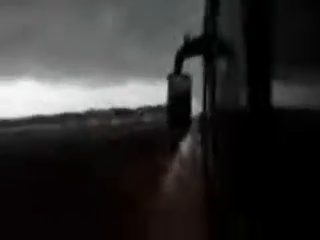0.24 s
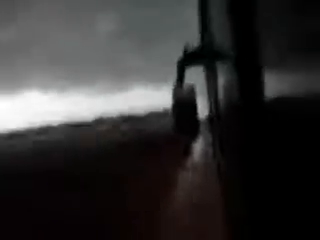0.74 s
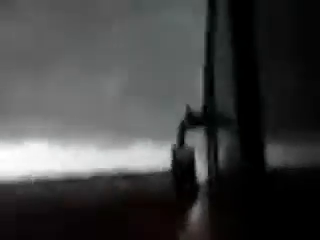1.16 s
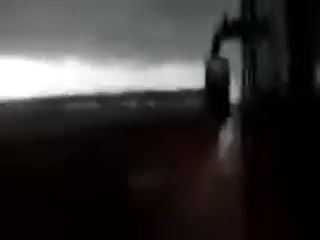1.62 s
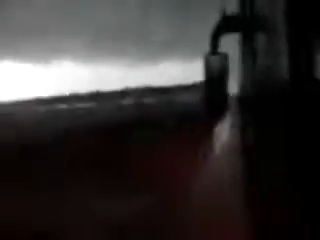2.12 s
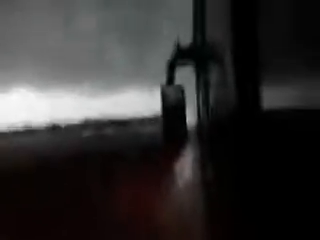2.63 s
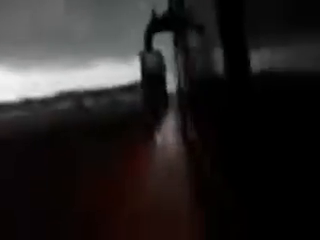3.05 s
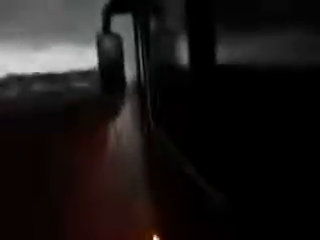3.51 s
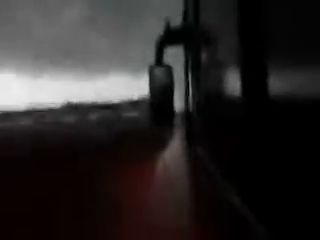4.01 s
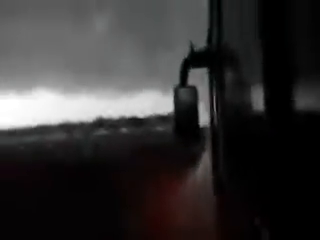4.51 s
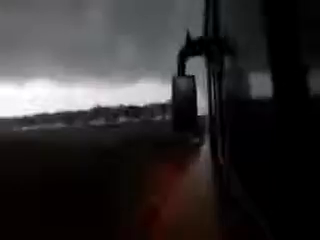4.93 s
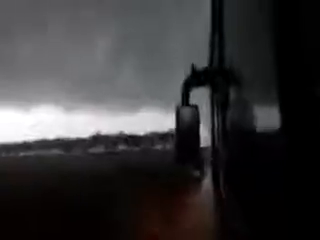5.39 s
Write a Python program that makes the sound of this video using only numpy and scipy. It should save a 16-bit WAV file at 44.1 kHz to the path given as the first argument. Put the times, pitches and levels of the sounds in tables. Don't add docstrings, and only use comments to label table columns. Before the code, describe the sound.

Inside a truck cab in a storm, wind throbs and slaps the phone microphone over drumming rain, hissing road spray and a low diesel drone.

```python
import sys
import numpy as np
from scipy import signal
from scipy.fft import rfft, irfft, next_fast_len
from scipy.io import wavfile
from scipy.ndimage import uniform_filter1d, map_coordinates

SR = 44100
rng = np.random.default_rng(int(sys.argv[2]) if len(sys.argv) > 2 else 0)


def pcm_store(signal):
    levels = np.round(np.clip(np.atleast_2d(signal), -1, 1) * 32767)
    wavfile.write(sys.argv[1], SR, levels.astype(np.int16).T)


def volts_from_db(level):
    exponent = np.asarray(level, float) / 20
    return 10 ** exponent


N = 249606


def unit(x):
    return x / np.sqrt(np.mean(np.abs(x) ** 2) + 1e-20)


def along(points, hz):
    point_hz, value = np.transpose(points)
    return np.interp(np.log(hz + 1), np.log(point_hz + 1), value)


def curves(rows, t):
    start_s, *columns = np.transpose(rows)
    return [np.interp(t, start_s, column) for column in columns]


def wobble(rate, t):
    return map_coordinates(rng.standard_normal(2000), [t * rate])


def bump(t, middle_s, length_s):
    return np.exp(-np.abs(2 * (t - middle_s) / length_s) ** 2.4)


def bursts(rows, edge):
    out, t = np.zeros(N + 8192), np.arange(-4096, 4096) / SR
    for middle_s, length_s, level_db in rows:
        shape = np.exp(-np.abs(2 * t / length_s) ** edge)
        out[round(middle_s * SR) - 4096:][:8192] += volts_from_db(level_db) * shape
    return out[:N]


def patter(rate, spread_db):
    hit = rng.random(N) < rate / SR
    size_db = spread_db * np.minimum(rng.exponential(size=N), 5)
    return unit(hit * rng.standard_normal(N) * volts_from_db(size_db))


def band(low_hz, high_hz, count):
    hz = np.fft.rfftfreq(count, 1 / SR)
    return unit(irfft(rfft(rng.standard_normal(count)) * (hz > low_hz) * (hz < high_hz), count))


def rumble(spectrum, even_s):
    count, width = next_fast_len(N), round(even_s * SR)
    gain = volts_from_db(along(spectrum, np.fft.rfftfreq(count, 1 / SR)))
    x = irfft(rfft(rng.standard_normal(count)) * gain, count)[:N]
    power = uniform_filter1d(uniform_filter1d(x ** 2, width), width)
    return x / np.sqrt(np.abs(power) + 1e-20)


def shaped(x, colour_db, patchy_db):
    hz, t, z = signal.stft(x, SR, nperseg=1024)
    patches = uniform_filter1d(rng.standard_normal(z.shape), size=12, axis=0)
    patches = unit(uniform_filter1d(patches, size=5, axis=1))
    gain = volts_from_db(colour_db(hz[:, None], t) + 0 * t)
    gain = gain / np.sqrt(np.mean(gain ** 2, axis=0))
    return unit(signal.istft(z * gain * volts_from_db(patchy_db * patches), SR, nperseg=1024)[1][:N])


# start_s, level_db
AIRSTREAM = [(0.23, -25.5), (0.62, -27.5), (0.64, -22), (1.42, -19.5), (1.79, -20), (1.85, -13),
             (2.94, -27.5), (2.97, -22.5), (3.06, -25), (3.38, -20.5), (3.42, -16.5), (3.48, -26),
             (3.53, -20), (3.87, -21.5), (4.84, -19), (5.66, -22)]


def airstream_db(t):
    return curves(AIRSTREAM, t)[0]


# middle_s, length_s, level_db, extra_bite_db
GUSTS = [(0.28, 0.092, -23.5, -5.5), (0.563, 0.069, -26.5, 6), (1.018, 0.059, -32, -24),
         (1.171, 0.12, -18.5, -11), (1.378, 0.11, -22.5, -0.5), (1.65, 0.079, -20, -11),
         (1.745, .05, -29, 3.5), (1.926, 0.059, -9.5, 0), (2.033, .12, -19.5, -0.5), (2.245, 0.17, -25, 3),
         (2.522, 0.24, -38, 8), (2.745, 0.031, -17, -8), (2.884, .1, -25, 1), (3.086, 0.18, -22.5, 0.5),
         (3.32, 0.14, -21.5, 2), (3.432, 0.11, -11, 2), (3.568, 0.23, -17.5, -0.5),
         (3.598, 0.037, -17.5, 6.5), (3.677, 0.081, -6, -11.5), (4.586, 0.15, -21, -3.5),
         (4.835, 0.12, -22.5, -6), (4.98, 0.064, -21, -10), (4.093, 0.31, -26.5, -2.5),
         (5.229, .1, -30, -14), (5.619, 0.13, -17, -10)]


def gusty(t, calm_db, bite_share):
    strength_db = airstream_db(t)
    lull_db = 0.37 * (strength_db - strength_db.mean())
    power = volts_from_db(2 * (calm_db + lull_db))
    for middle_s, length_s, level_db, bite_db in GUSTS:
        power = power + volts_from_db(2 * (level_db + bite_share * bite_db)) * bump(t, middle_s, length_s)
    return np.sqrt(power)


# pitch_hz, level_db
HEAVE = [(4, -20.5), (14, 5.5), (26, 2), (42, 4), (55, -13), (75, -8), (150, -74)]


def heave(t):
    return volts_from_db(airstream_db(t) + 1.8 + 2 * wobble(14, t)) * rumble(HEAVE, even_s=0.34)


# pitch_hz, level_db
THROB = [(30, -41), (52, 0), (80, -3.5), (120, -6.5), (150, -11), (260, -76)]


def throb(t):
    return gusty(t, calm_db=-25.5, bite_share=0) * rumble(THROB, even_s=0.12)


# pitch_hz, level_db
BUFFET = [(60, -43), (130, -12.5), (160, 2), (220, -2.5), (350, -5.5), (550, -11), (900, -36.5),
          (2000, -75)]


def buffet(t):
    rough = rumble(BUFFET, even_s=0.058)
    rough = unit(volts_from_db(2.1 * wobble(35, t)) * (rough + 0.12 * (rough ** 2 - 1)))
    return volts_from_db(-2.0) * gusty(t, calm_db=-30 - 0.1 * wobble(12, t), bite_share=1) * rough


# start_s (moment of the peak), peak_db, pitch_hz
POPS = [(.485, -8, 171), (0.554, -10, 182), (0.5678, -3.5, 145), (1.39, -10.5, 231), (1.8816, -2.5, 310),
        (1.9158, -17, 259.2), (1.943, -3.5, 150), (1.9506, -3.5, 109.5), (1.9717, -0.5, 153),
        (1.999, -1.5, 90.7), (2.075, -8.5, 79.6), (3.3121, -5, 265.7), (3.3248, -4, 168),
        (3.398, -12, 68.7), (3.4313, 3, 188), (3.449, -2, 189), (3.46, -3, 72.5), (3.469, 1, 153),
        (3.4795, -3, 75), (3.4951, 3.5, 272), (3.5247, -3, 254), (3.553, -3.5, 258), (3.587, 0, 112.6),
        (3.5924, -8.5, 214), (3.6512, -1.5, 62.3), (3.67, -5, 70.4), (3.6858, -1, 60), (3.699, -4.5, 58.5)]
# start_s (moment of the peak), peak_db, pitch_hz
FRONT = [
    (1.9092, 1.5, 110),
    (1.9104, -5, 480),
    (1.9252, .5, 165),
    (1.9248, -6, 520),
]
# start_s (moment of the peak), peak_db, pitch_hz
OVERLOAD = (3.4173, 1.6, 62)


def slapped(turbulence, t):
    loose, slaps, overload = turbulence.copy(), np.zeros(N), np.zeros(N)
    for start_s, peak_db, pitch_hz in POPS + FRONT + [OVERLOAD]:
        near = slice(round(start_s * SR) - 900, round(start_s * SR) + 1800)
        u = np.pi * pitch_hz * (t[near] - start_s)
        loose[near] *= 1 - 0.27 * np.exp(-(u / np.pi / 1.34) ** 2)
        push = (1 - 2 * u * u) * np.exp(-u * u) + 0.81 * np.exp(-(2.6 * u) ** 2)
        target = overload if start_s == OVERLOAD[0] else slaps
        target[near] += volts_from_db(peak_db - 7.5) * push
    out, stiff_at = loose + slaps, 0.86
    return out / (1 + (out / stiff_at) ** 6) ** (1 / 6) + overload


def wind(t):
    turbulence, limit = heave(t) + throb(t) + buffet(t), 0.6
    return slapped(limit * np.tanh(turbulence / limit), t)


# start_s, level_db
RAIN = [(.22, -30), (.5, -26.5), (1.25, -26), (1.5, -28.5), (2.25, -28.5), (3, -29.5), (3.5, -27),
        (3.75, -28), (4.25, -24.5), (4.7, -24), (5.1, -25.5), (5.66, -23)]
# start_s, drumming_top_hz, facing_opening_db
GAP = [(.2, 2680, 8.5), (.6, 3150, 5.5), (1, 2840, 6), (1.3, 2830, 5.5), (1.6, 2580, 4.5), (2, 2780, 1),
       (2.3, 2770, -1.5), (2.6, 2420, -4.5), (3, 2020, -3.5), (3.3, 2060, -11), (3.75, 2270, -4),
       (4, 2800, -2.5), (4.5, 2800, -1), (4.8, 2630, -3), (5.3, 2820, 6.5), (5.66, 3280, 7.5)]
# pitch_hz, level_db
SHELL = [(150, -25.5), (350, -10.5), (600, -1.5), (900, 0.5), (1650, -1), (2000, -3.5), (2400, -9.5),
         (4000, -7.5)]


def rain(t):
    def colour_db(hz, s):
        edge_hz, upper_db = curves(GAP, s)
        harder_db = curves(RAIN, s)[0] + 28.5
        lower = (0.1 - 0.61 * harder_db) * np.clip(np.log2(1250 / (hz + 1)) / 0.94, 0, 1)
        sings = 0.6 * np.maximum(harder_db, 0) * np.exp(-((hz - 1500) / 350) ** 2)
        upper = (upper_db + 1.0) * np.clip(np.log2((hz + 1) / 1500) / 0.85, 0, 1)
        ridge = 2.6 * np.exp(-((hz / edge_hz - 0.94) / 0.19) ** 2)
        cut = 10 * np.log10(1 + (hz / edge_hz) ** 40)
        return along(SHELL, hz) + sings + upper + lower + ridge - cut
    drums = patter(5000, spread_db=2.0) + 0.81 * rng.standard_normal(N)
    level_db = curves(RAIN, t)[0] + 4.0 + 0.35 * wobble(16, t)
    return volts_from_db(level_db) * shaped(drums, colour_db, patchy_db=0.93)


# middle_s, length_s, level_db
SPLASHES = [
    (1.22, 0.022, -33),
    (2.166, 0.0074, -22),
    (2.5, 0.0082, -59),
    (3.02, 0.017, -39),
    (3.12, 0.016, -30),
    (3.5, 0.026, -36.5),
    (3.28, 0.0065, -29),
    (5.6, 0.024, -31.5),
]


def thrown_water():
    return bursts(SPLASHES, edge=3.0)


# start_s, level_db
SPRAY = [(.22, -32), (.4, -29.5), (.62, -26.5), (.85, -30), (1.38, -29), (1.48, -33), (1.72, -32),
         (1.82, -27), (1.92, -30.5), (2.05, -28), (2.45, -25.5), (2.92, -28.5), (3.2, -26.5), (3.7, -26.5),
         (4, -24.5), (4.8, -21.5), (5.4, -23), (5.66, -19.5)]
# pitch_hz, level_db
MIST = [(1200, -26), (2200, 1), (3200, -0.5), (4500, 1), (6300, 0), (6850, -3.5), (6950, -30),
        (8000, -61.5)]
# middle_s, length_s, pitch_hz, level_db
GLINT = [
    (0.594, 0.4, 6060, 5.5),
    (1.308, 0.24, 5120, 5),
    (1.62, 0.27, 4830, -5),
    (2.852, 0.34, 4880, -5.5),
    (3.062, 0.03, 5540, -11.5),
    (3.164, .4, 5800, 3.5),
    (5.104, .5, 5970, 2.5),
    (5.6, 0.6, 4510, 5.5),
]


def hiss(t, sheets):
    def colour_db(hz, s):
        colour = along(MIST, hz)
        for middle_s, length_s, pitch_hz, level_db in GLINT:
            colour = colour + level_db * bump(s, middle_s, length_s) * np.exp(-((hz - pitch_hz) / 750) ** 2)
        return colour
    fizz = patter(9000, spread_db=2.0) + 1.28 * rng.standard_normal(N)
    level_db = curves(SPRAY, t)[0] + 1.76 + 0.41 * wobble(17, t)
    return (volts_from_db(level_db) + sheets) * shaped(fizz, colour_db, patchy_db=1.0)


# middle_s, length_s, level_db
SHEEN = [
    (0.598, .25, -51),
    (1.386, .8, -55),
    (2.2, 0.7, -43),
    (2.701, 0.65, -43),
    (3.352, 0.13, -45),
    (4.116, .3, -43.5),
    (4.65, 0.1, -44),
    (5.187, 1, -49),
]
# start_s, peak_db
FLICKER = [(0.35, -35), (0.658, -39.5), (0.7628, -34.5), (1.2896, -35), (1.382, -35), (1.8014, -31.5),
           (1.895, -33.5), (1.994, -28.5), (2.099, -37), (2.1586, -27), (2.323, -28.5), (2.3926, -34.5),
           (2.541, -29), (2.6375, -42), (2.835, -38.5), (3.04, -34.5), (3.092, -32), (3.1863, -34),
           (3.46, -39), (3.872, -35), (4.0144, -28.5), (4.183, -38.5), (4.335, -31.5), (4.59, -29.5),
           (4.71, -31.5), (4.752, -39), (4.835, -33), (5.08, -32)]
# pitch_hz, level_db
TOP = [(7400, -81.5), (7420, -1.5), (7800, -1), (8000, -4.5), (8150, -12), (8300, -20.5), (8400, -31),
       (8600, -49)]


def thin_top(t, sheets):
    wisps = volts_from_db(-46.5)
    for middle_s, length_s, level_db in SHEEN:
        wisps = wisps + volts_from_db(level_db) * bump(t, middle_s, length_s)
    lower = (wisps + 0.45 * sheets) * band(6930, 7400, count=next_fast_len(N))[:N]
    flare_s = 0.045
    flares = bursts([(s + flare_s / 2, flare_s, db - 11.5) for s, db in FLICKER], edge=6.0)
    upper_level = volts_from_db(-52) * (wisps / wisps.mean()) ** 0.74
    return lower + np.maximum(upper_level, flares) * rumble(TOP, even_s=0.2)


def spray(t):
    sheets = thrown_water()
    return hiss(t, sheets) + thin_top(t, sheets)


# start_s, pitch_hz, level_db
ENGINE = [(.22, 68, -29.5), (.6, 66.88, -27), (.8, 66.71, -27.5), (1, 66.3, -27), (1.5, 64.87, -28),
          (2, 63.8, -37.5), (2.6, 63.34, -29.5), (3.2, 64.2, -36), (3.9, 63.3, -33), (4.3, 63, -33),
          (4.7, 61.44, -35.5), (5.66, 59.9, -49)]
# multiple, level_db
FIRING = [(1, -1.5), (2, -2.5), (3, -7), (4, -22), (5, -15.5)]


def engine(t):
    firing_hz, level_db = curves(ENGINE, t)
    turn = 2 * np.pi * np.cumsum(firing_hz * (1 + 0.006 * wobble(13, t))) / SR
    drone = np.zeros(N)
    for multiple, tone_db in FIRING:
        drone += volts_from_db(tone_db + 2.3 * wobble(4, t)) * np.sin(multiple * turn + multiple ** 2)
    return np.sqrt(2) * volts_from_db(level_db) * drone


# start_s, peak_db, pitch_hz
DROPS = [(0.3854, -7, 1890), (0.985, -17, 1390), (1.3904, -1.5, 438), (1.797, -11, 1296),
         (1.9996, -23.5, 1126), (2.245, -8.5, 700), (3.1, -20.5, 3020), (3.1035, -27, 2961),
         (3.9304, -16.5, 2030), (4.0593, -14, 1700), (4.278, -20.5, 1489), (4.626, -19, 1600),
         (4.7157, -3, 2630), (4.9677, -14, 1490)]
# start_s, peak_db, pitch_hz
SMACK = [
    (3.0913, -4.5, 1100),
    (3.0916, -4, 4800),
]


def drops():
    out, t = np.zeros(N + 600), np.arange(600) / SR
    for start_s, peak_db, pitch_hz in DROPS + SMACK:
        ring = volts_from_db(-60 * t * pitch_hz / 5.1) * np.sin(2 * np.pi * pitch_hz * t)
        fade = (1 - np.exp(-t / 0.0006)) * volts_from_db(-60 * t / 0.006)
        tick = ring + 0.5 * fade * band(1500, 6900, count=len(t))
        for _ in range(2):
            tick = signal.lfilter([0.25, 0.5, 0.25], 1, tick)
        out[round(start_s * SR):][:len(t)] += volts_from_db(peak_db) * tick
    return out[:N]


def scene():
    t = np.arange(N) / SR
    cab = wind(t) + rain(t) + spray(t) + engine(t) + drops()
    return np.array([cab, cab])


# middle_s, low_hz, high_hz
FILLS = [(0.286, 5170, 8200), (.77, 4220, 7200), (1.045, 4600, 6000), (1.555, 6960, 8200),
         (2.49, 7700, 8300), (3.67, 6400, 7830), (3.86, 5200, 6400), (4.145, 7700, 8360),
         (4.466, 5700, 7900), (5.435, 5200, 6270), (5.48, 4150, 5460), (5.505, 6400, 8300)]


def side_fills(dry):
    out = np.zeros((2, N))
    hz, fade = np.fft.rfftfreq(2048, 1 / SR), signal.windows.tukey(2048, 0.7)
    for middle_s, low_hz, high_hz in FILLS:
        frame = slice(round(middle_s * SR) - 1024, round(middle_s * SR) + 1024)
        backwards = rfft(dry[0, frame][::-1])
        unlike = irfft(backwards * (hz > low_hz) * (hz < high_hz))
        out[:, frame] += volts_from_db(-4.5) * unlike * fade * [[1], [-1]]
    return out


def low_pass(x):
    return signal.sosfilt(signal.butter(12, 8660, fs=SR, output="sos"), x)


def record(dry):
    t, count = np.arange(N) / SR, next_fast_len(N)
    below_top = np.fft.rfftfreq(count, 1 / SR) < 8400
    x = irfft(rfft(dry - 0.012, count) * below_top, count)[:, :N]
    x = x * np.clip((t - 0.2168) / 0.0013, 0, 1)
    x = x / (1 + np.abs(x / 1.12) ** 12) ** (1 / 12)
    return low_pass(x + side_fills(dry))


dry = scene()
out = record(dry)
pcm_store(out)
```